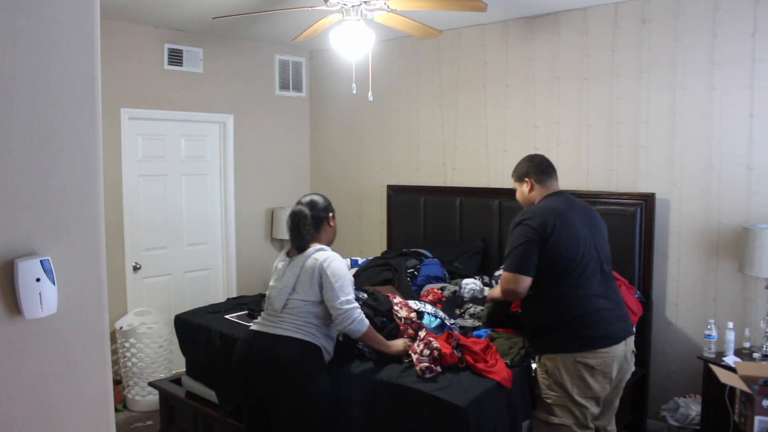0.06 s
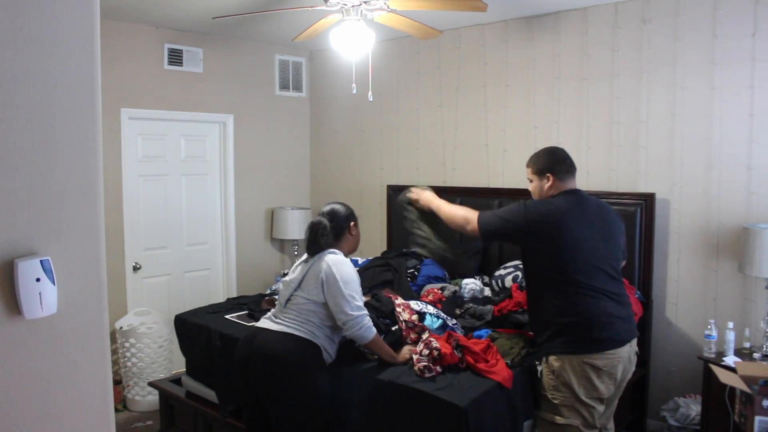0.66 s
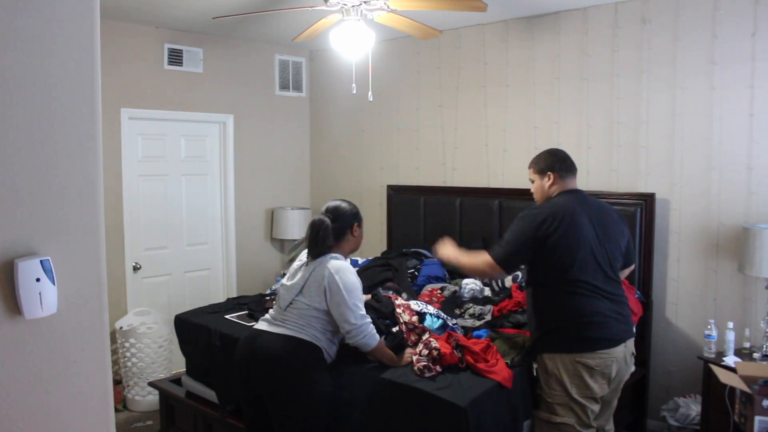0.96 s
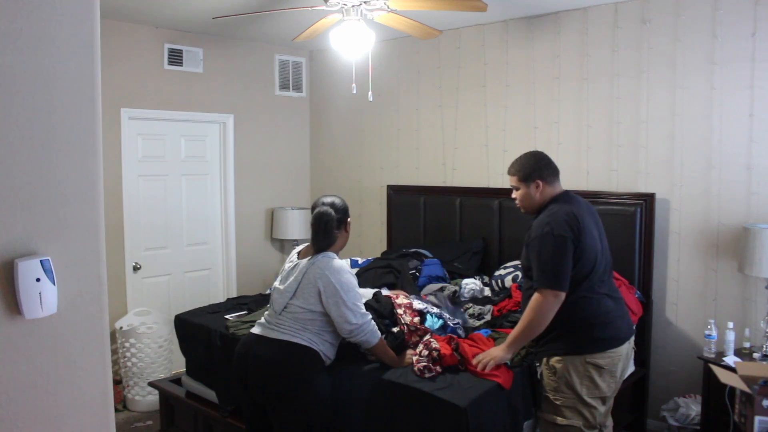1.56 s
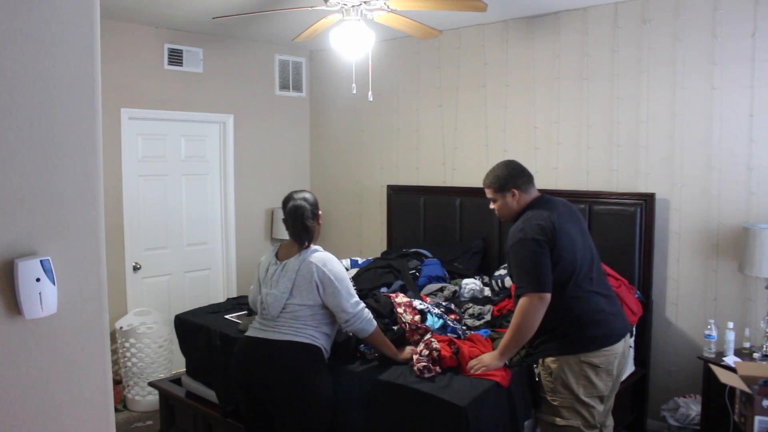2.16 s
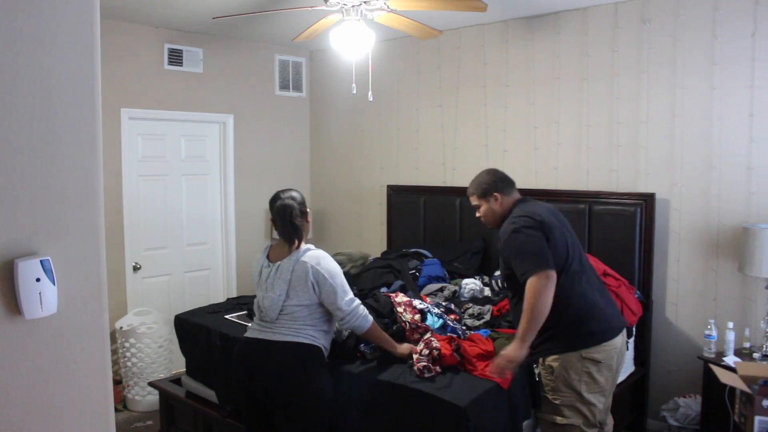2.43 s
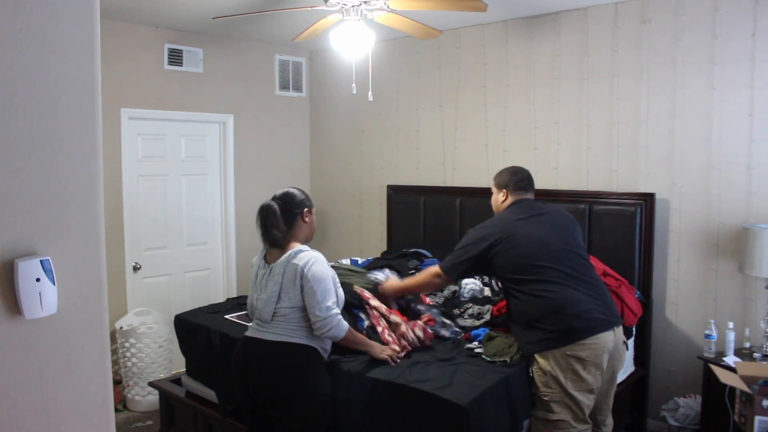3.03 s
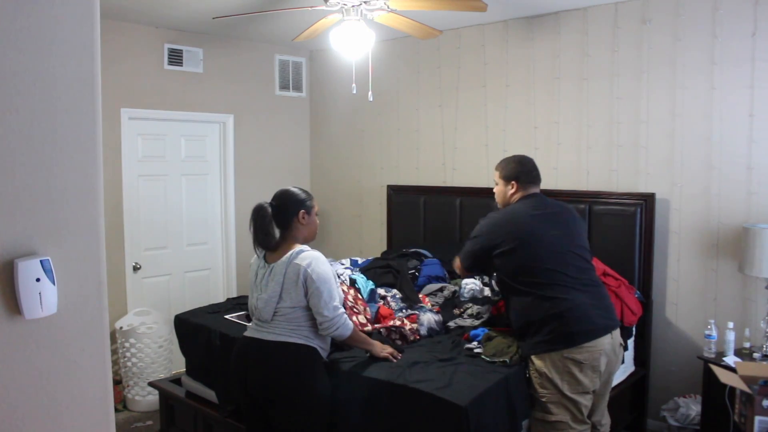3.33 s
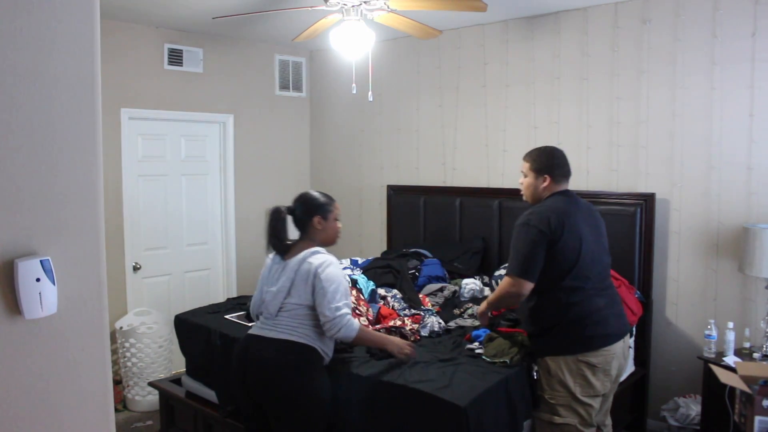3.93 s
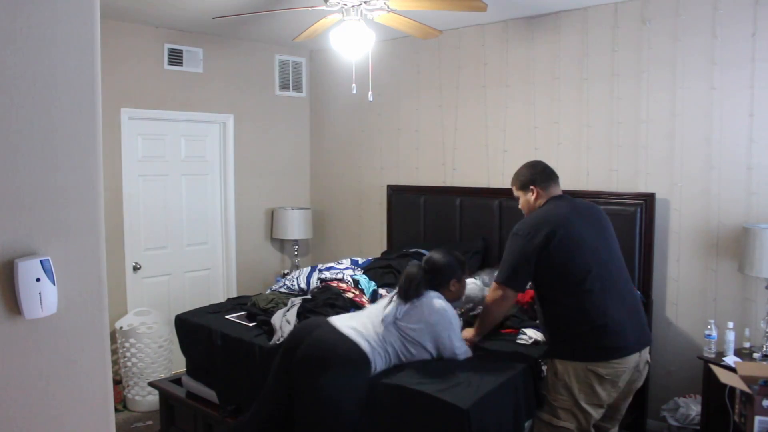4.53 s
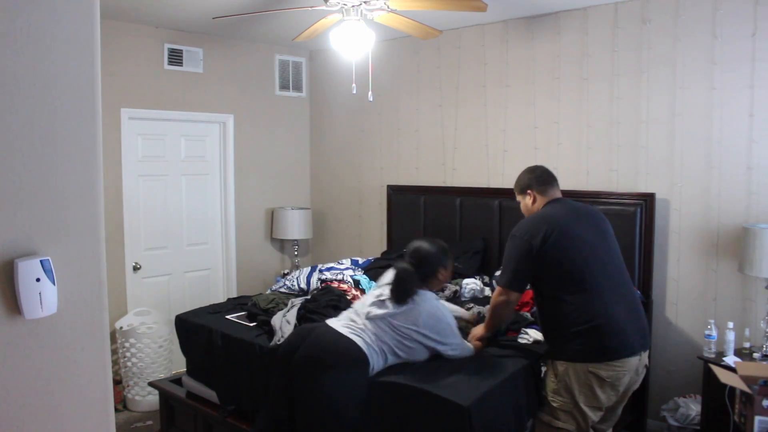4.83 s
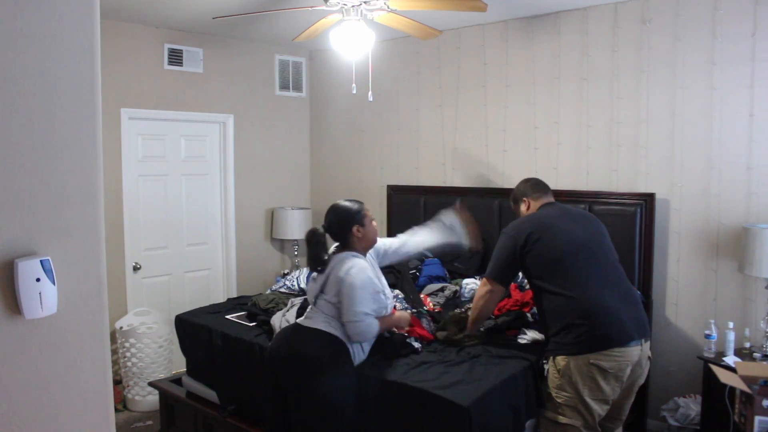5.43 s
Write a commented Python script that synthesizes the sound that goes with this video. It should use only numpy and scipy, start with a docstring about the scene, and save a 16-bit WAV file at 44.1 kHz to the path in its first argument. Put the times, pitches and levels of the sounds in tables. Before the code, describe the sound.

Faint hiss fills a small bedroom. Close to the microphone a focusing camera lens ticks and knocks irregularly, most clearly at 0.4 and 0.6 seconds, and again around 2.5, 2.8 and 4.1 seconds. A few steps away, clothes rub and rustle softly throughout, with light pats on the bedding and a small click near 2 seconds. At 2.9 seconds hands and garments land more heavily with a padded thump, followed by an airy swish. At 4.3 seconds someone slides across the bedspread with a slightly hollow rub, then drops onto the mattress at 4.7 seconds with a low boom and a smaller bump just after. A garment whips through the air at 5.1 seconds. At about 5.6 seconds something thrown lands with a sharp smack and a thud from the bed, the loudest moment, trailed by a brief rustle.

```python
"""Two people sort clothes on a bed in a small bedroom, a few steps from the microphone.
From the start a focusing lens ticks and knocks close by, over faint room hiss. Cloth rubs and swishes;
garments and hands land on the bedding, heavily at 2.9 s. At 4.3 s someone slides across the mattress
and at 4.7 s drops onto it, so the bed booms. A garment whips through the air at 5.1 s,
and at 5.6 s a thrown thing lands with a sharp smack."""
import sys
import numpy as np
from scipy import signal
from scipy.io import wavfile

SR = 44100
rng = np.random.default_rng(int(sys.argv[2]) if len(sys.argv) > 2 else 0)


def int16_out(signal):
    """Quantize to a 16-bit WAV file."""
    q = np.round(np.clip(np.atleast_2d(signal).T, -1, 1) * 32767)
    wavfile.write(sys.argv[1], SR, q.astype(np.int16))


N = 250849
TIME_S = np.arange(N) / SR
EDGES_HZ = np.geomspace(22, 16500, 25)


def from_db(db):
    """Decibels to gain."""
    return 10 ** (np.asarray(db) / 20)


def rms_one(x):
    """Scale to unit power."""
    return x / np.sqrt(np.mean(x ** 2) + 1e-20)


def at_hz(points, hz):
    """Read a table on a log-frequency axis."""
    freqs_hz, values = np.transpose(points)
    return np.interp(np.log(hz), np.log(freqs_hz), values)


def fade(t_s, t60_s):
    """Exponential decay, 60 dB down at t60_s."""
    return np.exp(-np.log(1000) * t_s / max(t60_s, 1e-3))


def butter(x, hz, kind, order=2):
    """Butterworth filter."""
    return signal.sosfilt(signal.butter(order, hz, kind, fs=SR, output="sos"), x)


def add(out, t_s, sound):
    """Mix a sound in at t_s."""
    at = int(np.clip(round(t_s * SR), 0, N - 1))
    out[..., at:at + sound.shape[-1]] += sound[..., :N - at]


def ring(force, modes):
    """Damped modes driven by a force."""
    out = 0
    for hz, db, t60_s in modes:
        r, w = fade(1 / SR, t60_s), 2 * np.pi * hz / SR
        out += from_db(db) * signal.lfilter([0, np.sin(w)], [1, -2 * r * np.cos(w), r * r], force + 1e-18)
    return out


def pulse(width_s):
    """Smooth contact force of unit area."""
    shape = np.hanning(max(int(width_s * SR), 3))
    return shape / shape.sum()


def pan(x, left_db):
    """Stereo, left louder than right by left_db."""
    return x * from_db([[left_db / 2], [-left_db / 2]])


def noise_bands(kind):
    """Stereo noise as (centre/Hz, width/Hz, band); kind sets the left-right correlation."""
    # correlation: f/Hz, firm (landings, slide), loose (rustle), air (hiss)
    likeness = [(60, 0.96, 0.97, 0.77), (130, .997, 1, 0.73), (280, 0.99, 0.93, -0.49),
                (600, 0.79, 0.78, -0.42), (1200, 0.68, 0.58, -0.49), (2470, 0.63, 0.7, -0.88),
                (5000, 0.55, 0.42, -0.39), (9000, .2, 0.19, -0.064), (14000, .1, .1, 0.43)]
    # stereo balance: f/Hz, left minus right/dB
    balance = [(50, -5), (150, -1), (280, -0.5), (600, -3), (2000, -1.5), (12000, -1.5)]
    curve = np.array(likeness)[:, [0, {"firm": 1, "loose": 2, "air": 3}[kind]]]
    white = rng.standard_normal((2, 2, N))
    for k, (low_hz, high_hz) in enumerate(zip(EDGES_HZ, EDGES_HZ[1:])):
        hz = np.sqrt(low_hz * high_hz)
        alike = at_hz(curve, hz)
        mid, side = butter(white[k % 2], [low_hz, high_hz], "band")
        mid = rms_one(mid) * np.sqrt((1 + alike) / 2)
        side = rms_one(side) * np.sqrt((1 - alike) / 2)
        yield hz, high_hz - low_hz, pan(np.array([mid + side, mid - side]), at_hz(balance, hz))


def coloured_noise(kind, layers):
    """Stereo noise from layers of (total power, spectrum)."""
    centres_hz = np.sqrt(EDGES_HZ[1:] * EDGES_HZ[:-1])
    out = 0
    for hz, width_hz, band in noise_bands(kind):
        band_power = 0
        for power, spectrum in layers:
            total = np.sum(from_db(at_hz(spectrum, centres_hz)) ** 2 * np.diff(EDGES_HZ))
            band_power += power * from_db(at_hz(spectrum, hz)) ** 2 * width_hz / total
        out += band * np.sqrt(band_power)
    return out


def slips(per_s, t60_s, spread_db=1.0):
    """Folds catch and let go at random, in brief surges of friction; power with mean 1."""
    onsets = rng.random(N) < per_s / SR
    sizes = from_db(spread_db * np.minimum(rng.exponential(1, N), 4)) ** 2
    power = signal.lfilter([1], [1, -fade(1 / SR, t60_s) ** 2], onsets * sizes + 1e-18)
    return power / power.mean()


def stroke(t_s, swell_s, release_s, db, hold_s=0, depth_db=19):
    """Power of one movement: climbs depth_db in the swell to t_s, holds, sinks as far in the release."""
    before = np.maximum(t_s - TIME_S, 0) / swell_s
    after = np.maximum(TIME_S - t_s - hold_s, 0) / release_s
    return from_db(db - depth_db * np.minimum(before + after, 10)) ** 2


def bedroom(x):
    """Near walls echo; standing waves favour a few pitches."""
    # wall echoes: delay/s, level/dB
    walls = [(.0071, -21), (0.0139, -36), (0.0186, -20)]
    # standing waves: f/Hz, width/Hz, gain/dB
    room_modes = [(160.7, 32, -1.5), (196.6, 9.7, -2.5), (312, 45, -1.5), (627, 49, -4), (1135, 68, -3.5),
                  (1393, 84, -5.5), (2247, 24, -6)]
    echoed = x.copy()
    for delay_s, db in walls:
        add(echoed, delay_s, from_db(db) * x)
    return echoed + sum(from_db(db) * signal.lfilter(*signal.iirpeak(hz, hz / width_hz, fs=SR), echoed)
                        for hz, width_hz, db in room_modes)


def room_hiss(db=-55):
    """Faint steady hiss of the room."""
    # hiss spectrum: f/Hz, density/dB
    spectrum = [(25, 1), (55, -2), (90, -3), (150, -3), (230, -9.5), (420, -8), (650, -9), (1100, -12.5),
                (1800, -13), (5000, -19), (10000, -24.5), (15500, -31)]
    return coloured_noise("air", [(from_db(db) ** 2, spectrum)])


def focus_ticks(per_s=15, stray_share=0.15, stray_db=-57.5):
    """The lens hunts in even runs of steps, plus stray single ones: (t/s, level/dB)."""
    # hunting runs: t/s, tick count, level/dB
    hunts = [(0.133, 3, -49), (0.966, 1, -48.5), (1.36, 1, -43), (1.867, 1, -48), (2.168, 4, -52.5),
             (2.467, 1, -51), (2.601, 2, -51), (2.767, 1, -45.5), (3.969, 2, -49.5)]
    runs = [(t_s + k / per_s, db) for t_s, count, db in hunts for k in range(count)]
    beats_s = np.arange(0, N / SR, 1 / per_s)
    return runs + [(t_s, stray_db) for t_s in beats_s[rng.random(len(beats_s)) < stray_share]]


def lens(travel_s=0.04, step_hz=1148):
    """A focus move kicks the housing, rattles through quick steps and thuds to a stop; small ones tick."""
    # focus moves: t/s, knock/dB, rattle/dB
    moves = [(0.0, -49, -57), (0.049, -47, -55), (0.389, -38, -37), (0.64, -38, -37.5),
             (1.68, -44.5, -50.5), (2.504, -40.5, -48), (2.824, -39.5, -43.5), (3.365, -41.5, -46),
             (3.713, -50.5, -60), (4.08, -40, -41), (5.377, -40, -45.5), (5.41, -47, -48)]
    # housing modes: f/Hz, level/dB, t60/s
    housing = [(118, 2.5, 0.15), (172, 2, 0.047), (206, -5, 0.26), (312.7, -2, 0.073), (670, 0.5, 0.033),
               (886, -6.5, 0.052), (1077, -5.5, 0.031), (1151, -14.5, 0.12), (1306, -14.5, 0.039),
               (2500, -15, 0.019), (4430, -10.5, 0.0038)]
    kicks, steps = np.zeros((2, N))
    for t_s, knock_db, rattle_db in moves:
        add(steps, t_s, from_db(rattle_db - 4.5) * pulse(0.00011))
        add(kicks, t_s, from_db(knock_db - 7.5) * pulse(0.0028))
        add(kicks, t_s + 0.01166, from_db(knock_db) * pulse(0.0037))
        add(kicks, t_s + travel_s, from_db(knock_db - 2) * pulse(0.002))
        run_s = 0.0037 + np.cumsum(1 + 0.33 * rng.standard_normal(12)) / step_hz
        for delay_s, strength in zip(run_s, np.hanning(len(run_s))):
            add(steps, t_s + delay_s, from_db(rattle_db - 0.5) * strength * pulse(0.00017))
    for t_s, db in focus_ticks():
        add(steps, t_s, from_db(db) * pulse(0.0002))
    knocks = ring(butter(kicks, 70, "high"), housing)   # small housing: no deep bass
    ticks = ring(butter(steps, 550, "high"), housing)   # light steps reach only the upper modes
    return pan(knocks, left_db=-2) + pan(ticks, left_db=-5)


def cloth_rustle(idle_db=-68):
    """Hands shift, rub and swish the cloth; light cloth has less bulk and swishes more."""
    # hand strokes: peak t/s, swell/s, release/s, rub/dB, lightness/dB
    strokes = [(0.04, 0.34, 0.16, -61.5, -8), (0.72, 0.98, 0.42, -64.5, -0.5), (1.22, 0.28, 0.22, -59, -7),
               (1.55, 1, 0.94, -59, 5), (2.45, 0.41, 0.5, -69.5, -3), (2.77, 0.11, .15, -62.5, 7.5),
               (3.0, .22, 0.36, -52.5, -4.5), (3.2, 0.34, 0.19, -56, 29), (3.48, 0.24, 0.14, -63.5, -1),
               (4.19, 0.093, 0.9, -68, -10.5), (4.54, 0.6, 0.77, -54.5, -1),
               (4.93, 0.16, 0.22, -55.5, -0.5), (5.16, 0.22, .26, -52, 4), (5.44, 0.15, 0.06, -54.5, -1),
               (5.66, 0.29, .2, -52, -3.5)]
    # garment whipped through the air: peak t/s, swell/s, release/s, level/dB
    whips = [(5.118, 0.11, 0.077, -51.5)]
    # spectra of shifting bulk, rubbing and swishing: f/Hz, density/dB
    bulk_spectrum = [(30, 0), (60, 6.5), (140, 0), (300, -4), (450, -10), (700, -10), (1500, -24),
                     (4000, -50)]
    rub_spectrum = [(200, -3), (600, 4.5), (1300, 0), (2200, 2.5), (4500, 0), (7000, -6), (15000, -20)]
    swish_spectrum = [(2000, -18), (5000, -10.5), (8000, -3.5), (11000, -11.5), (15500, -19)]
    bulk, rub = 0, from_db(idle_db) ** 2   # clothes never lie quite still
    swish = sum(stroke(*whip) for whip in whips)
    for t_s, swell_s, release_s, db, light_db in strokes:
        effort = stroke(t_s, swell_s, release_s, db)
        bulk += effort * from_db(6 - light_db) ** 2
        rub += effort
        swish += effort * from_db(-9.5 + 0.11 * light_db) ** 2
    folds = slips(per_s=1400, t60_s=0.11)
    rub *= folds * from_db(9)
    swish *= folds * from_db(5.5)
    return coloured_noise("loose", [(bulk, bulk_spectrum), (rub, rub_spectrum), (swish, swish_spectrum)])


def bedspread_hum(t60_s=0.059):
    """Cloth dragged over the taut bedspread drives one hollow resonance."""
    # drags: t/s, length/s, f/Hz, level/dB
    drags = [(2.871, 0.057, 653, -32), (4.277, 0.14, 631, -36), (4.365, 0.14, 648, -40)]
    out = np.zeros(N)
    for t_s, length_s, hz, db in drags:
        hum = rms_one(ring(rng.standard_normal(SR // 2), [(hz, 0, t60_s)]))
        progress = np.clip(TIME_S[:SR // 2] / length_s, 0, 1)
        add(out, t_s, from_db(db) * hum * np.sin(np.pi * progress ** 0.66))
    return pan(out, left_db=-4.5)


def body_slide():
    """Friction of a body crossing the bedspread in two shoves."""
    # shoves: full speed t/s, swell/s, hold/s, release/s, level/dB
    shoves = [(4.319, 0.052, .04, 0.23, -34), (4.435, .09, 0.014, 0.071, -36)]
    # friction spectrum: f/Hz, density/dB
    spectrum = [(30, -2), (70, -2.5), (170, -3), (280, -3), (420, -11), (640, -4), (850, -10.5),
                (1400, -10), (2000, -15.5), (3500, -12), (6000, -20), (10000, -24), (15500, -40)]
    power = sum(stroke(t_s, swell_s, release_s, db, hold_s)
                for t_s, swell_s, hold_s, release_s, db in shoves)
    return coloured_noise("firm", [(power * slips(per_s=1300, t60_s=0.044), spectrum)])


def landings(slap_hz=750, weight_hz=202, weight_octaves=1.32, tail_db=-8):
    """Noise bursts with a room tail: folds collapsing as things land, and one echo of the smack."""
    # landings; the last row is the smack's quick echo off the floor or wall:
    # t/s, slap/dB, tilt/(dB/octave), weight/dB, t60/s
    bursts = [(0.729, -50.5, -3, -2, 0.12), (0.779, -49, -10, -2.5, 0.054), (0.795, -48, -4, -12, 0.11),
              (1.227, -57, 2.5, 26.5, 0.069), (1.522, -53, -1.3, -15, 0.1), (2.052, -51.5, 1.54, 6.5, 0.16),
              (2.877, -35, -3.5, 2.5, 0.18), (2.918, -37.5, -2, 14.5, 0.03), (3.059, -52.5, 3, 17.5, 0.12),
              (3.398, -69, 3.5, 13, 0.07), (4.552, -46, -8, 3, 0.081), (4.671, -31.5, -5.5, -0.5, 0.13),
              (4.91, -50.5, -9, 1.5, 0.11), (5.555, -26.5, -1.5, -6, 0.1), (5.573, -25.5, -1.8, -31, 0.071)]
    # burst colour: f/Hz, band level/dB
    colour = [(25, -24), (45, -5.5), (100, -2), (200, -7), (400, -6.5), (640, -1), (830, -1), (1150, 1.5),
              (2000, -0.5), (3500, 2.5), (8000, -2.5), (11000, -9.5), (15500, -17)]
    # room decay: f/Hz, t60/s
    room_t60 = [(50, 0.67), (200, 0.36), (700, 0.37), (3000, 0.44), (8000, 0.37), (15000, 0.13)]
    age_s, out = TIME_S[:SR // 2], 0
    folds = slips(per_s=2500, t60_s=0.013)
    for hz, _, band in noise_bands("firm"):
        tail = (from_db(tail_db) * fade(age_s, at_hz(room_t60, hz))) ** 2
        hump = np.exp(-(np.log2(hz / weight_hz) / weight_octaves) ** 2)
        octaves = np.log2(max(hz, weight_hz) / slap_hz)
        bass_db = 6 * min(np.log2(hz / weight_hz), 0)   # below the hump, cloth moves little air
        power = np.zeros(N)
        for t_s, slap_db, tilt, weight_db, t60_s in bursts:
            db = slap_db + tilt * octaves + weight_db * hump + at_hz(colour, hz) + bass_db
            rise_s = 0.0079 * 2 ** (-tilt / 5)   # brighter is quicker
            swell = np.minimum(age_s / rise_s, 1) ** 2
            add(power, t_s - rise_s / 2, from_db(db) ** 2 * swell * (fade(age_s, t60_s) ** 2 + tail))
        out += band * np.sqrt(power * folds)
    return out


def bed_boom():
    """Heavy landings push on the mattress; it bounces and the bed's low modes boom."""
    # pushes: t/s, push/dB, contact/s, bounce/dB
    pushes = [(2.895, -34, 0.0019, -60), (2.92, -29, 0.0023, -57), (2.955, -27, 0.0038, -57),
              (4.683, -15.5, 0.0056, -20.5), (4.916, -28.5, 0.0084, -37), (5.56, -12, 0.006, -44)]
    # modes of the bed and of the mattress bounce: f/Hz, level/dB, t60/s
    bed_modes = [(80, -5, 0.13), (171, -15, 0.57), (205, -3.5, 0.15), (319.3, 10.5, 0.11), (740, -18, 0.14)]
    bounce_mode = [(44.5, -1, 0.38)]
    force, weight = np.zeros((2, N))
    for t_s, push_db, contact_s, bounce_db in pushes:
        add(force, t_s, from_db(push_db) * pulse(contact_s))
        add(weight, t_s, from_db(bounce_db) * pulse(contact_s))
    boom = ring(butter(force, 66, "high"), bed_modes)   # the boom carries little deep bass
    return pan(boom + ring(weight, bounce_mode), left_db=-2)


def smacks(body_hz=(500, 2000), top_hz=(2800, 8300), top_db=-1.5, rise_s=0.0012):
    """A hard edge strikes: milliseconds of bright noise and a brief ring."""
    # strikes: t/s, level/dB, t60/s, ring/dB
    strikes = [(2.053, -44, 0.012, -51), (2.065, -38, 0.017, -43.5), (5.5583, -15, 0.014, -18.5)]
    # modes of the hard things: f/Hz, level/dB, t60/s
    clack_modes = [(524, -6.5, 0.074), (1030, 2, 0.037), (1165, -17, 0.15), (1460, -21, .1),
                   (1770, -11, 0.16), (2220, -20, 0.31), (2453, -16.5, 0.34), (3100, -2, 0.074)]
    age_s, out, force = TIME_S[:SR // 20], np.zeros((2, N)), np.zeros(N)
    for t_s, db, t60_s, ring_db in strikes:
        white = rng.standard_normal((3, len(age_s)))
        body = rms_one(butter(white[0], body_hz, "band", order=1))
        top = rms_one(butter(white[1:] + white[0], top_hz, "band"))
        envelope = fade(age_s, t60_s) * np.minimum(age_s / rise_s, 1)
        add(out, t_s, from_db(db) * (body + from_db(top_db) * top) * envelope)
        add(force, t_s, from_db(ring_db) * pulse(0.00033))
    return pan(out + ring(force, clack_modes), left_db=-4)


def scene():
    """The lens at the microphone; cloth, landings and bed across the room."""
    in_room = bedroom(room_hiss() + cloth_rustle() + body_slide() + landings())
    return lens() + in_room + bedspread_hum() + bed_boom() + smacks()


def record(dry, low_hz=34, cutoff_hz=15650):
    """Sound reaches the left port one sample late; deep bass rolls off and the top is cut steeply."""
    ports = np.array([np.append(0, dry[0, :-1]), dry[1]])
    ports = butter(ports, low_hz, "high")
    return signal.sosfilt(signal.ellip(10, 0.1, 80, cutoff_hz, fs=SR, output="sos"), ports)


dry = scene()
out = record(dry)
int16_out(out)
```